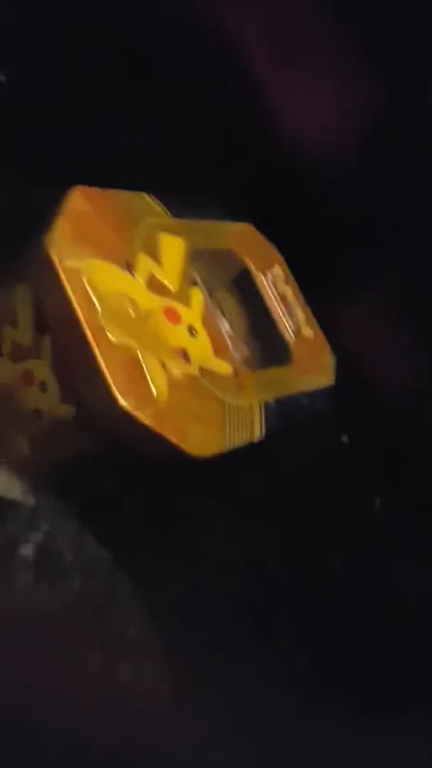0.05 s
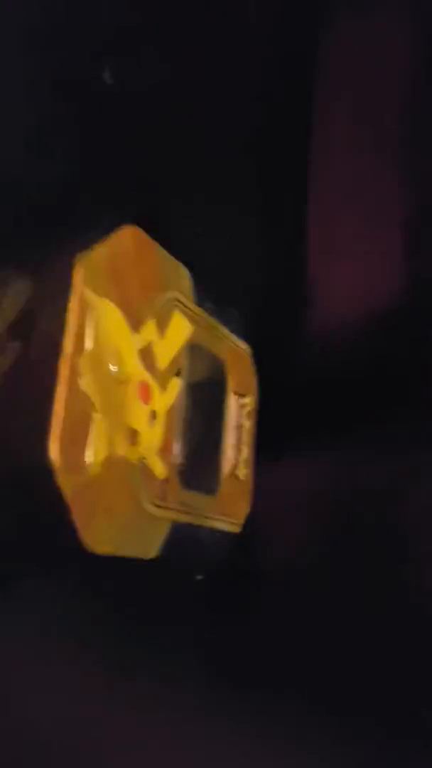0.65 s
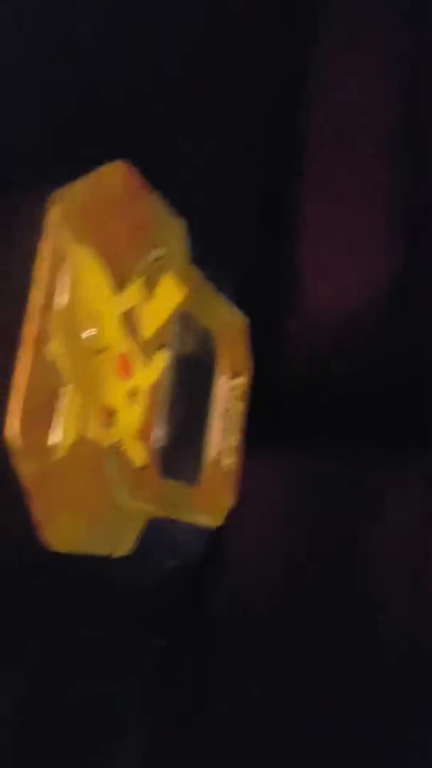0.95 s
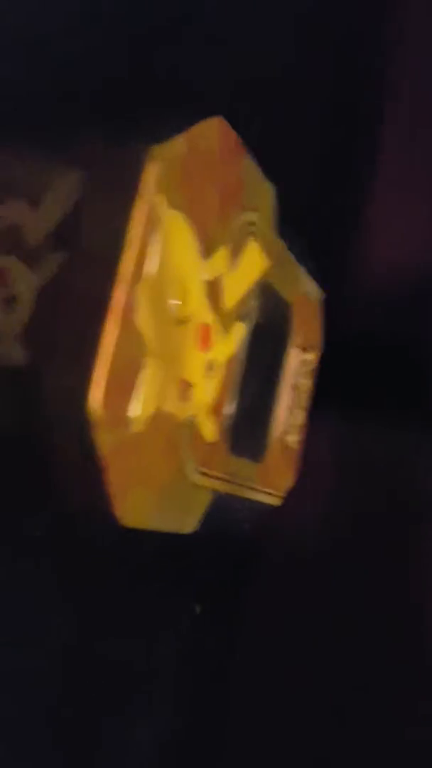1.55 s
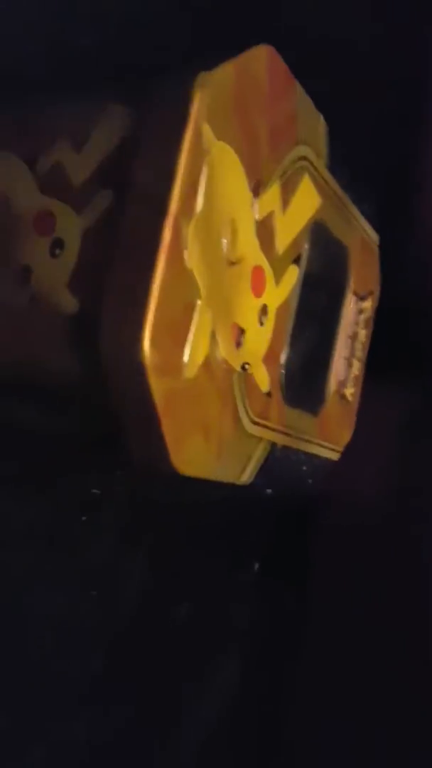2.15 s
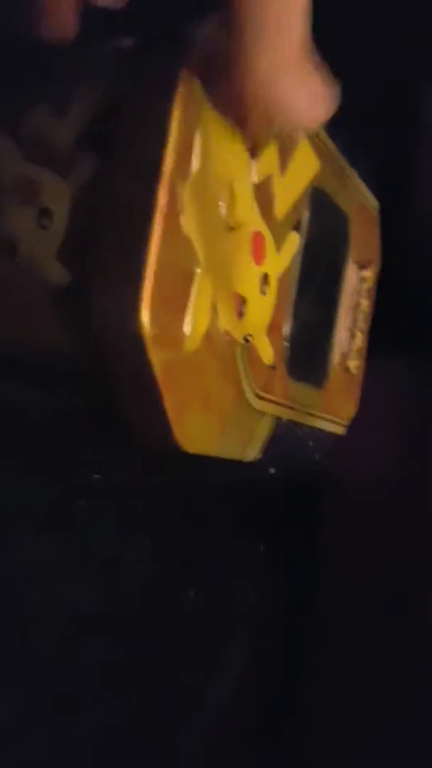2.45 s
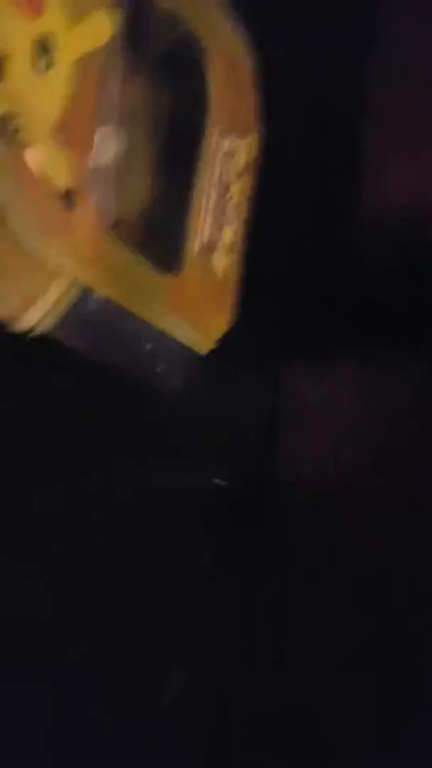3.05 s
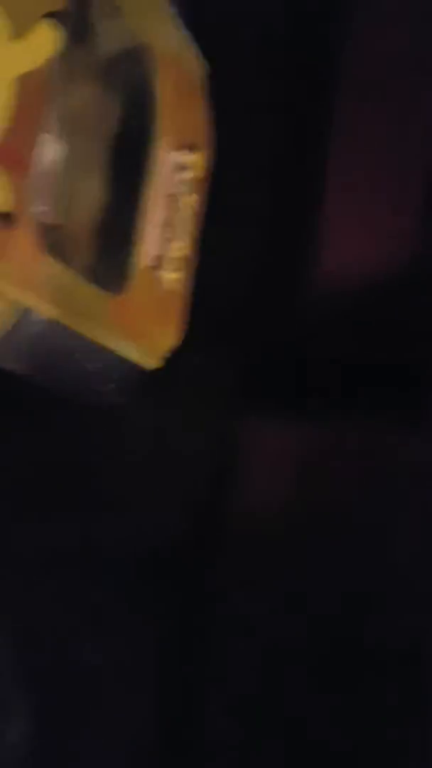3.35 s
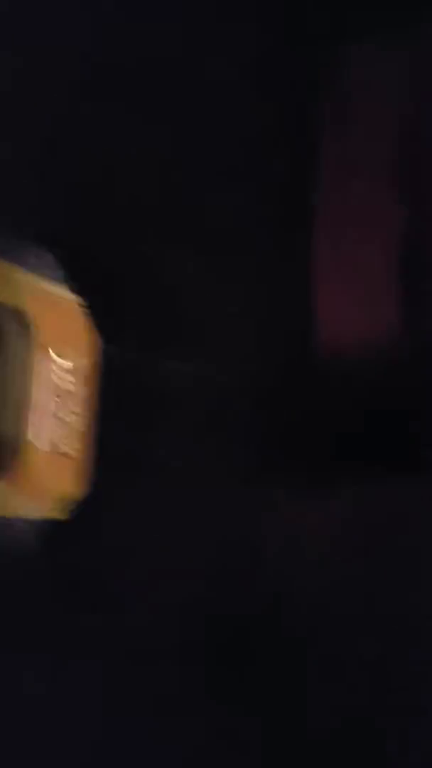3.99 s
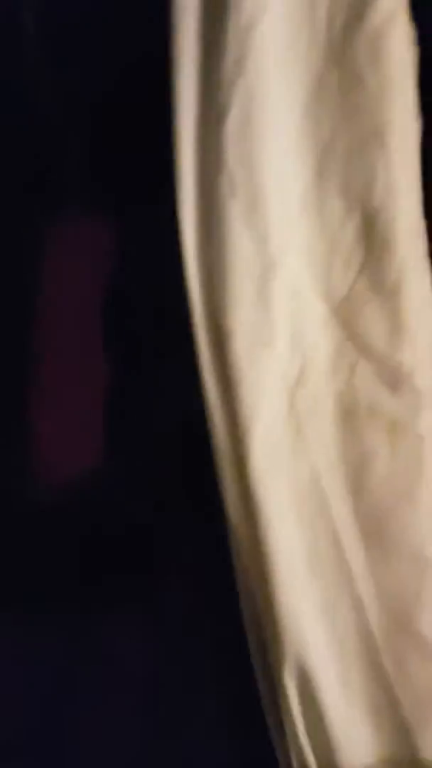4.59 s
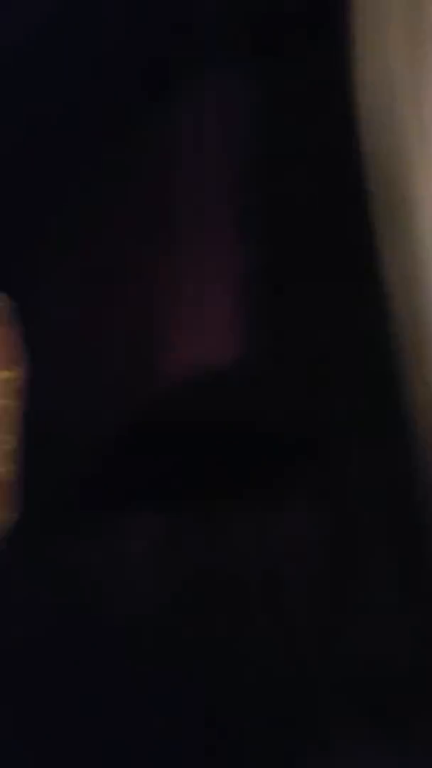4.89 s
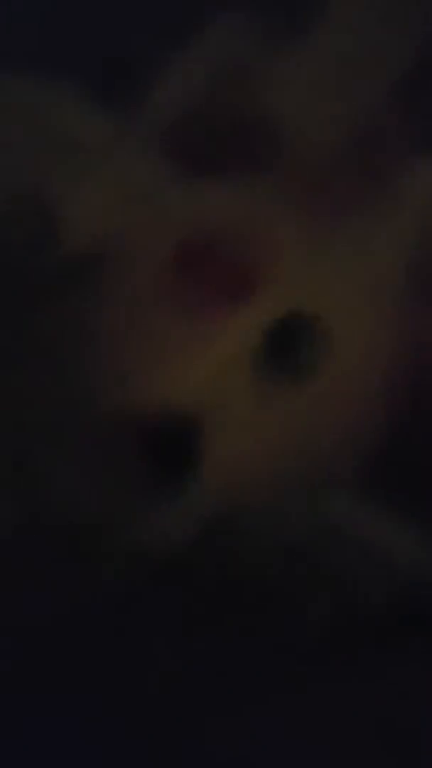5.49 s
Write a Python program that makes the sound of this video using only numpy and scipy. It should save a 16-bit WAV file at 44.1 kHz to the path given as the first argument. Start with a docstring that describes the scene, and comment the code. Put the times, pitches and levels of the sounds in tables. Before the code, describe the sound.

A small, quiet room holds a faint electrical hum. A hand shifts its grip close to the microphone, giving a dull click at about 0.8 seconds and a weaker one at 1.3. From 2.6 seconds a finger taps a thin metal tin, making its panels ring briefly, and drags it over a shelf with a rough, juddering scrape until 3.4, with a couple of dull knocks near the end. The hum swells with a low rumble meanwhile. From 3.7 to 5 seconds, skin slides softly over the metal, with scattered light clicks and a faint hiss. At 5.2 seconds the tin bumps the shelf with a sharp knock and a low thud. After a little more rubbing, it is set down at 5.5 with a loud clack and short rattle, then settles with a brief scrape and a small tap by 5.7.

```python
"""In a small, quiet room with a mains hum, a thin metal card tin is handled on a shelf.
A hand shifts its grip on a casing close to the microphone, with dull clicks. A finger taps the tin,
so its panels ring, and drags it out: it sticks and slips with a rough rub. Background hiss swells and
the hand slides softly over the metal. Then the tin bumps the shelf and is set down with a clack and a
short rattle, a few quick blows that ring its panels and rim."""
import sys
import numpy as np
from scipy import signal
from scipy.fft import rfft, irfft, next_fast_len
from scipy.io import wavfile
from scipy.ndimage import uniform_filter1d

SR = 44100
rng = np.random.default_rng(int(sys.argv[2]) if len(sys.argv) > 2 else 0)


def master(y):
    """Save y as 16-bit WAV."""
    cut = np.clip(np.atleast_2d(y).T, -1, 1)
    pcm = np.round(cut * 32767)  # scale
    wavfile.write(sys.argv[1], SR, pcm.astype(np.int16))


N = 252863
TIME = np.arange(N) / SR

# shifts of the grip, and at 5.161 and 5.36 s two low booms of the shelf; here and below, fade_s is the time a
# sound takes to drop by 60 dB # start_s, thump_db, pitch_hz, fade_s, ring_db, left_over_right_db
GRIP_KNOCKS = [(0.154, -38.5, 326, 0.011, -87, -18), (0.7627, -5.5, 410, 0.0034, -21.5, 17.5),
               (0.908, -51.5, 400, 0.018, -64, -19), (1.033, -46, 690, 0.023, -73, 8),
               (1.2989, -24, 328, 0.0058, -43.5, 22), (1.3086, -40.5, 273, 0.0082, -57, 33),
               (3.6584, -22.5, 230, 0.018, -56.5, 20), (3.6665, -23.5, 253, 0.003, -88, 31),
               (4.502, -30.5, 160, 0.071, -67, -1), (4.525, -21.5, 162, 0.0091, -67, -1),
               (4.998, -28.5, 35, 0.029, -80, -17), (5.161, -35, 51.5, 0.17, -45, 11),
               (5.36, -44, 42, 0.29, -75, 4)]


def from_db(db):
    """Turn decibels into a gain to multiply by."""
    return 10 ** (np.asarray(db) / 20)


def rms_one(x):
    """Scale a sound so that its average (rms) level is 1."""
    return x / np.sqrt(np.mean(x ** 2) + 1e-20)


def at_hz(points, hz):
    """Read a curve of (pitch, value) points at the given pitches."""
    pitches, values = np.array(points).T
    return np.interp(np.log(hz + 1), np.log(pitches), values)


def panned(db):
    """Gains that make the left side db louder than the right."""
    return from_db(np.array([[db], [-db]]) / 2)


def add(out, start_s, sound):
    """Mix a short sound in at the given time."""
    start = round(start_s * SR)
    out[..., start:start + sound.shape[-1]] += sound[..., :N - start]


def cut(x, hz, keep, order=2):
    """Keep the "low" or the "high" side of hz; a higher order cuts more steeply."""
    return signal.sosfilt(signal.butter(order, min(hz, .45 * SR), keep, fs=SR, output="sos"), x)


def drift(turns_per_s):
    """A random curve that wanders around zero by about 1."""
    points = rng.standard_normal(N // 20)
    return np.interp(TIME * turns_per_s, np.arange(len(points)), points)


def stroke(start_s, length_s, rise_s, fall_s):
    """Gain that rises smoothly from zero and falls back."""
    up, down = (TIME - start_s) / rise_s, (start_s + length_s - TIME) / fall_s
    return np.sin(np.pi / 2 * np.clip(np.minimum(up, down), 0, 1)) ** 2


def ramp(start_s, length_s, db_per_s):
    """Gain that changes steadily for a while."""
    return from_db(db_per_s * np.clip(TIME - start_s, 0, length_s))


def swells(rows):
    """Gain of several swells that rise and fall evenly."""
    return sum(from_db(db) * stroke(start, length, length / 2, length / 2) for start, length, db in rows)


def noise(colour, size=N):
    """Stereo noise shaped by (pitch_hz, level_db) points; both sides are most alike in the bass."""
    # how alike left and right are: pitch_hz, likeness (0 to 1)
    likeness = [(60, 1), (300, 0.61), (700, 0.56), (1400, 0), (16000, 0.04)]
    padded = next_fast_len(size)
    hz = np.arange(padded // 2 + 1) * SR / padded
    common, opposite = rfft(rng.standard_normal((2, padded)))
    alike = np.clip(at_hz(likeness, hz), 0, 1)
    pair = np.sqrt(1 + alike) * common + np.sqrt(1 - alike) * opposite * [[1], [-1]]
    return rms_one(irfft(pair * from_db(at_hz(colour, hz)), padded)[:, :size])


def body(tones, low_hz, top_hz, wash_fade_s, left_lag_ms, size=10000, wash_db=-15.5):
    """How an object rings after one click: its main tones over a wash of crowded weak ones."""
    t = TIME[:size]
    delay_s = np.maximum([[left_lag_ms], [-left_lag_ms]], 0) / 1000
    age = np.maximum(t - delay_s, 0)
    rings = sum(from_db(db - 60 * age / fade_s) * np.sin(2 * np.pi * hz * age)
                for hz, db, fade_s in tones)
    strongest_db = max(db for _, db, _ in tones)
    wash = rms_one(cut(noise([(100, -27), (400, 19), (20000, -5)], size), top_hz, "low"))
    wash = wash * from_db(strongest_db + wash_db - 60 * t / wash_fade_s)
    # a small panel gives off little sound outside the range of its tones
    return cut(cut(rings + wash, low_hz, "high", order=3), top_hz, "low", order=6)


def excite(force, ring):
    """Every push in the force sets off its own copy of the ring."""
    return signal.fftconvolve(np.atleast_2d(force), ring, axes=-1)[:, :N]


def blows(rows):
    """Force of a series of blows; a softer contact lasts longer and sounds duller."""
    force, t = np.zeros(N), TIME[:512]
    for start_s, db, brightness_hz in rows:
        pulse = t * np.exp(-2 * np.pi * brightness_hz * t)
        add(force, start_s, from_db(db) * pulse / pulse.sum())
    return force


def hum_and_air(hum_db=-52.5, air_db=-64, swell_start_s=2.375, swell_length_s=3.15):
    """Mains hum over soft room air; the hum swells with a low rumble, then falls back."""
    # the mains tone and a fainter drone: pitch_hz, level_db (added to the hum's level)
    hum_tones = [(99.8, -8), (288, -23)]
    # colour of the quiet room air: pitch_hz, level_db
    air_colour = [(20, -13), (55, 3.5), (150, 3), (230, -4), (400, -1), (620, -4), (760, 1), (950, -7),
                  (1500, -5), (3000, -11), (5000, -17.5), (8300, -18), (9500, -28), (13000, -17.5),
                  (16000, -22)]
    (mains_hz, mains_db), (drone_hz, drone_db) = hum_tones
    swell = from_db(-35.5) * stroke(swell_start_s, swell_length_s, rise_s=0.9, fall_s=0.27)
    swell *= ramp(swell_start_s, swell_length_s, db_per_s=-3.5)
    mains_gain = (from_db(hum_db) + swell) * from_db(mains_db - 0.24 * drift(23.5))
    mains = mains_gain * np.sin(2 * np.pi * mains_hz * TIME)
    drone = from_db(hum_db + drone_db) * np.sin(2 * np.pi * drone_hz * TIME + 0.34 * drift(20))
    rumble = swell * from_db(-15) * noise([(20, -16), (75, 12), (135, 9.5), (210, -1.5), (1000, -28)])
    return np.sqrt(2) * (mains + drone) * panned(-3.5) + rumble + from_db(air_db) * noise(air_colour)


def skin_crackle(catches_per_s=8.2, low_hz=2500, top_hz=11000):
    """Dry fingertips catch and let go at random, each time with a very faint click."""
    strengths = from_db(-51 + rng.standard_normal(N))
    catches = (rng.random(N) < catches_per_s / SR) * strengths
    hiss = cut(cut(rng.standard_normal((2, 256)), low_hz, "high"), top_hz, "low")
    click = hiss * np.exp(-TIME[:256] / 0.00096)
    return excite(catches, click) * panned(3)


def nail_ticks(fade_s=0.0068, size=2048):
    """A fingernail touches lightly: a tiny burst of noise that dies within milliseconds."""
    # fingernail touches: start_s, level_db, pitch_hz, left_over_right_db
    touches = [(0.0643, -50, 2730, -23), (0.7638, -27.5, 8450, 8), (1.2995, -37.5, 7000, 10),
               (1.9172, -42, 13200, -6), (1.918, -46.5, 3000, -15), (1.9770, -40.5, 9500, 16),
               (1.9990, -42.5, 8600, 17), (2.571, -41, 8000, -2), (3.5946, -33.5, 3000, -15.5),
               (3.658, -26, 1510, 8.5), (3.7739, -39.5, 970, 6), (4.0441, -29, 2430, -16.5),
               (4.2553, -36.5, 11500, 6), (4.428, -32.5, 4030, -4), (4.5742, -28, 2800, -6),
               (5.1561, -26, 5020, -2.5), (5.5148, -32, 9100, -13), (5.574, -43, 9400, -12),
               (5.592, -38, 14000, -15), (5.7106, -36, 2950, -4)]
    out = np.zeros((2, N))
    for start_s, db, hz, pan_db in touches:
        burst = noise([(hz / 6, -30), (hz / 2, -7.5), (hz, 0), (hz * 2, -15), (hz * 6, -30)], size)
        add(out, start_s, panned(pan_db) * burst / 2 * from_db(db - 60 * TIME[:size] / fade_s))
    return out


def grip_knocks(size=8192):
    """Each shift of the grip gives a dead thump and a brief ring of the casing; the two low booms of the shelf
    are played the same way."""
    # ringing tones of the gripped casing: pitch_hz, level_db, fade_s
    casing_tones = [(780, -9, 0.0091), (1210, 0.5, 0.004), (1410, -2.5, 0.034), (2240, -1.5, 0.0038),
                    (3570, -8.5, 0.014), (6100, -12.5, 0.0057)]
    casing = body(casing_tones, low_hz=486, top_hz=6500, wash_fade_s=0.017, left_lag_ms=0, size=size)
    out, t = np.zeros((2, N)), TIME[:size]
    for start_s, thump_db, hz, fade_s, ring_db, pan_db in GRIP_KNOCKS:
        thump = from_db(thump_db - 60 * t / fade_s) * np.sin(2 * np.pi * hz * t)
        knock = cut(thump, 0.75 * hz, "high") + from_db(ring_db) * casing
        add(out, start_s, panned(pan_db) * knock)
    return out


def finger_creep(hiss_s=0.06, hiss_over_thump_db=-51):
    """The holding fingers creep on the casing; a faint, brief high hiss also follows each knock."""
    # slow finger movements: start_s, length_s, level_db
    creeps = [(0.58, 0.25, -66), (1.29, 0.088, -60), (1.4, 0.1, -64), (1.82, 0.46, -70.5)]
    # colour of skin rubbing the casing: pitch_hz, level_db
    creep_colour = [(700, -3), (1250, -17), (1450, 12), (1750, -18), (4800, -11.5), (6100, -11),
                    (7200, -14), (12000, -9), (16000, -24)]
    hiss_gain = swells((start_s, hiss_s, db + hiss_over_thump_db) for start_s, db, *_ in GRIP_KNOCKS)
    hiss = rms_one(cut(rng.standard_normal((2, N)), 6000, "high"))
    return (swells(creeps) * noise(creep_colour) + hiss_gain * hiss) * panned(10)


def tin_ring():
    """The tin's thin panels ring with many tones at once."""
    # ringing tones of the panels: pitch_hz, level_db, fade_s
    panel_tones = [(252.4, -28, 0.31), (312, -32, 0.088), (334, -27.5, 0.18), (380.6, -23, 0.12),
                   (473, -13, 0.031), (537.4, -26, 0.11), (587, -25.5, 0.068), (777, -22, 0.17),
                   (843, -15, 0.022), (1002, -27, 0.034), (1212, -26, 0.12), (1293, -22.5, 0.059),
                   (1403, -30, 0.067), (1655, -51, 0.09), (1965, -29, 0.13), (1980, -53, 0.027),
                   (2537, -22, 0.043), (2570, -35, 0.24), (3740, -26, 0.021), (4150, -38.5, 0.091)]
    return body(panel_tones, low_hz=207, top_hz=4170, wash_fade_s=0.18, left_lag_ms=-0.25)


def tin_knocks(tin):
    """Finger taps, and later the landing on the shelf, set the panels ringing."""
    # blows on the panels: start_s, strength_db, brightness_hz
    hits = [(2.5715, -28.5, 4860), (2.618, -31.5, 1750), (2.704, -25, 250), (2.769, -17, 1410),
            (2.816, -14, 595), (2.932, -11, 1500), (2.995, -8.5, 960), (3.213, 0, 494), (3.289, -3, 800),
            (5.1575, -17, 1710), (5.175, -30, 2600), (5.2035, -18, 1900), (5.354, -26, 1400),
            (5.5145, -42, 3970), (5.5408, -13, 1390), (5.5432, -15, 1400), (5.5497, -6.5, 1390),
            (5.5520, -7.5, 1410), (5.672, -18, 2080), (5.7115, -27, 2900)]
    return excite(blows(hits), tin) * panned(2.2)


def tin_drag(tin, slips_per_s=900, slip_spread_db=4, judder_db=2, grain_db=2):
    """Sticking and slipping shakes the tin's panels; the same judder pulses the grit under its edge."""
    # the tin drags over the shelf, and later settles: start_s, length_s, rumble_db, grit_db
    drags = [(2.71, 0.69, -33.5, -47), (5.534, 0.21, -42, -54.5)]
    rumble_gain, grit_gain = np.zeros(N), np.zeros(N)
    for start_s, length_s, rumble_db, grit_db in drags:
        sliding = stroke(start_s, length_s, rise_s=0.18, fall_s=0.15)
        grinding = stroke(start_s, length_s, rise_s=0.21, fall_s=0.2)   # the edge grinds only at speed
        # the hand bears down, so the rub deepens
        rumble_gain += from_db(rumble_db + 1) * sliding * ramp(start_s, length_s, db_per_s=8.5)
        grit_gain += from_db(grit_db + 2) * grinding * ramp(start_s, length_s, db_per_s=-1.5)
    judder = from_db(judder_db * drift(70))
    slips = (rng.random(N) < slips_per_s / SR) * from_db(slip_spread_db * rng.standard_normal(N))
    slips *= rng.choice([-1, 1], N) * judder
    # each slip is a dull tug with a sharp edge that reaches the high tones
    force = cut(slips, 190, "low", order=1) + from_db(-24) * slips
    rumble = excite(cut(force, 272, "high", order=5), tin)
    # the steady push of the hand evens out the slips over about a tenth of a second
    rumble /= np.sqrt(uniform_filter1d(np.mean(rumble ** 2, axis=0), size=4000) + 1e-12)
    # colour of the grit under the edge: pitch_hz, level_db
    grit_colour = [(300, 19), (1500, 7.5), (2600, -1), (3600, -7.5), (6000, -11), (7800, -8), (9800, -18.5),
                   (12500, -15.5), (16000, -23)]
    grit = rms_one(cut(noise(grit_colour), 1780, "high"))
    grit *= np.sqrt(judder) * from_db(grain_db * drift(900))
    singing = from_db(-9) * rms_one(excite(cut(grit, 1000, "high"), tin))   # grit rings the high tones
    return rumble_gain * rumble * panned(3) + grit_gain * (grit + singing) * panned(1)


def edge_scuffs():
    """The tin's edge skids, giving a brief swell of rubbing noise around one pitch."""
    # skids: middle_s, length_s, level_db, pitch_hz, width_hz
    skids = [(3.112, .05, -39.5, 2410, 1100), (3.716, .03, -53, 1400, 1870),
             (4.193, 0.025, -42.5, 1200, 790), (5.378, 0.067, -60, 370, 150),
             (5.5156, 0.007, -16.5, 3380, 1120), (5.552, .018, -14.5, 766, 466),
             (5.554, .035, -27.5, 1220, 445), (5.6, 0.11, -35.5, 550, 320)]
    out = np.zeros((2, N))
    for middle_s, length_s, db, hz, width_hz in skids:
        size = int(length_s * SR)
        band = signal.butter(2, [hz - width_hz / 2, hz + width_hz / 2], "band", fs=SR, output="sos")
        rub = rms_one(signal.sosfilt(band, rng.standard_normal((2, size))))
        add(out, middle_s - length_s / 2, from_db(db) * rub * np.hanning(size))
    return out


def background_hiss(flutter_db=1):
    """Soft background hiss rises and falls in slow swells."""
    # swells of the hiss: start_s, length_s, level_db
    hiss_swells = [(3.2, 0.64, -56.5), (3.75, 1.0, -52.5), (4.55, 0.72, -56), (5.08, 0.49, -49.5)]
    # colour of the hiss: pitch_hz, level_db
    hiss_colour = [(94, -30), (160, -1.5), (269, -15.5), (396, -12.5), (924, -19.5), (1260, -19),
                   (1380, -25), (2200, -16), (5540, -26.5), (8150, -27), (14500, -36.5), (16000, -35)]
    return swells(hiss_swells) * from_db(flutter_db * drift(36)) * noise(hiss_colour) * panned(-2)


def hand_slide(grain_db=2.5, catch_db=3.2):
    """Skin slides over printed metal, catching lightly as it goes."""
    # strokes of the hand over the tin: start_s, length_s, rise_s, level_db
    slides = [(3.84, 0.89, 0.3, -49), (4.017, 0.26, 0.039, -55.5), (4.387, 0.061, 0.066, -53),
              (4.477, 0.4, 0.017, -57.5), (5.164, 0.12, 0.019, -36), (5.227, 0.31, 0.14, -42.5),
              (5.419, 0.24, 0.13, -43.5), (5.616, 0.2, 0.14, -46.5)]
    # colour of skin rubbing the tin: pitch_hz, level_db
    skin_colour = [(76, -119), (130, 6.5), (183, -2.5), (279, -4.5), (342, 4.5), (427, 2), (491, -5.5),
                   (1220, -5.5), (1340, -6.5), (1930, -7), (2400, -9.5), (3000, -18), (4500, -23.5),
                   (12800, -35), (16000, -36)]
    speed = sum(from_db(db) * stroke(start_s, length_s, rise_s, max(length_s - rise_s, .01))
                for start_s, length_s, rise_s, db in slides)
    friction_db = grain_db * drift(600) + catch_db * drift(50)
    return speed * from_db(friction_db) * noise(skin_colour) * panned(-4.5)


def rim_clacks():
    """The tin's stiff rolled rim strikes, and its tones die quickly: a clack."""
    # blows on the rim: start_s, strength_db, brightness_hz
    hits = [(4.0438, -40, 6000), (4.426, -32.5, 2480), (4.5043, -29.5, 3500), (4.5731, -58, 4000),
            (5.158, -3, 1190), (5.5141, -13.5, 5950), (5.5150, -4.5, 6530), (5.5161, -46, 6000),
            (5.5405, -1.5, 960), (5.5428, -3, 640), (5.5497, -4, 696), (5.672, -25.5, 2430)]
    # ringing tones of the rim: pitch_hz, level_db, fade_s
    rim_tones = [(510, -3, 0.015), (1356, -8.5, 0.031), (1734, -31, 0.011), (2120, 2.5, 0.0066),
                 (2870, -9, 0.0077), (3300, -28, 0.0068), (3620, -27, 0.0053), (3790, -10, 0.014),
                 (3685, -31, 0.0177)]
    rim = body(rim_tones, low_hz=356, top_hz=4390, wash_fade_s=0.058, left_lag_ms=0.099)
    return excite(blows(hits), rim) * panned(-0.49)


def shelf_bumps():
    """The tin bumps the shelf, and the board answers with a low thud."""
    # blows on the shelf: start_s, strength_db, brightness_hz
    hits = [(5.1592, 3, 600), (5.1620, -1.5, 470), (5.1648, -2.5, 393), (5.232, -20.5, 450)]
    # ringing tones of the board: pitch_hz, level_db, fade_s
    board_tones = [(141, -18, 0.13), (191, -14.5, 0.084), (253, -11.5, 0.053), (353, -13, 0.1),
                   (417.5, -6, 0.11), (600, -34, 0.037)]
    board = body(board_tones, low_hz=125, top_hz=743, wash_fade_s=0.17, left_lag_ms=0.23)
    return excite(blows(hits), board) * panned(-0.5)


def room(x, echo_db=-23.5, fade_s=0.35, first_wall_s=0.006, size=20000):
    """The walls add a short, dull echo that starts with the first wall's bounce."""
    t = TIME[:size]
    tail = noise([(100, 30.5), (600, 7.5), (2500, 3.0), (10000, -61)], size)
    tail *= from_db(-60 * t / fade_s) * (t > first_wall_s)
    return x + from_db(echo_db) * excite(x, tail / np.sqrt(np.sum(tail ** 2)))


def scene():
    """The tin's knocks and drag echo in the room; handling sounds, hiss and hum have no echo."""
    tin = tin_ring()
    echoing = room(tin_knocks(tin) + rim_clacks() + shelf_bumps() + tin_drag(tin))
    handling = grip_knocks() + edge_scuffs() + nail_ticks() + hand_slide()
    handling += finger_creep() + skin_crackle()
    return echoing + handling + background_hiss() + hum_and_air()


def record(dry, ceiling=0.9, top_hz=16000):
    """Round off the loudest peaks and cut the highest treble."""
    rounded = dry / (1 + (np.abs(dry) / ceiling) ** 6) ** (1 / 6)
    return signal.sosfilt(signal.ellip(10, .2, 70, top_hz, fs=SR, output="sos"), rounded)


dry = scene()
out = record(dry)
master(out)
```